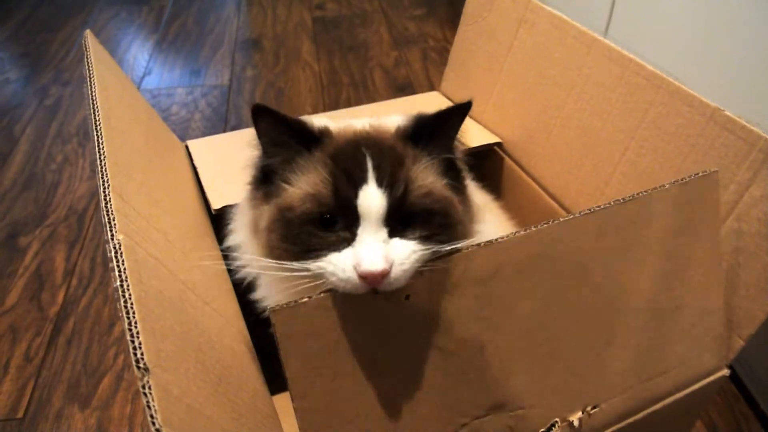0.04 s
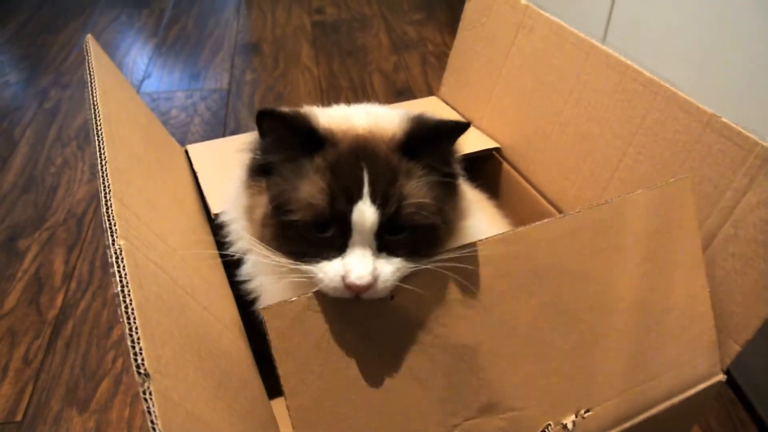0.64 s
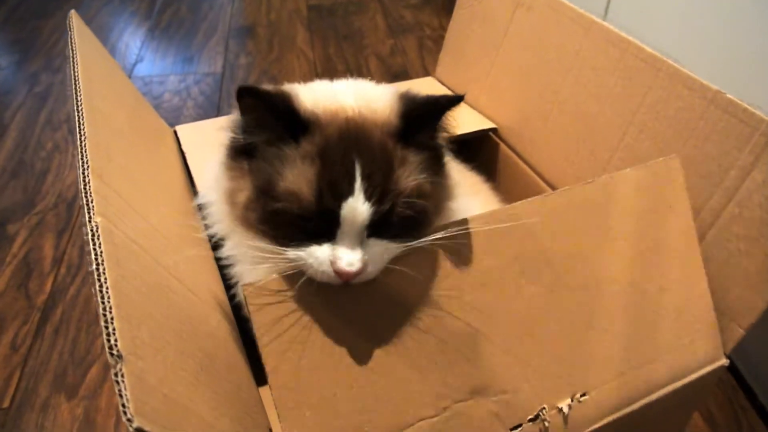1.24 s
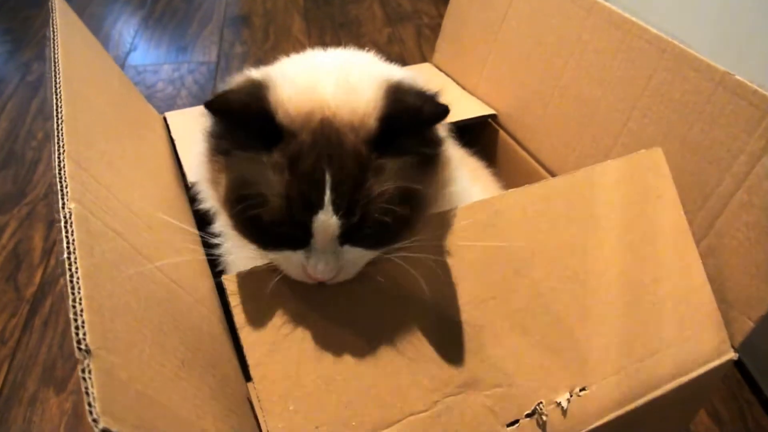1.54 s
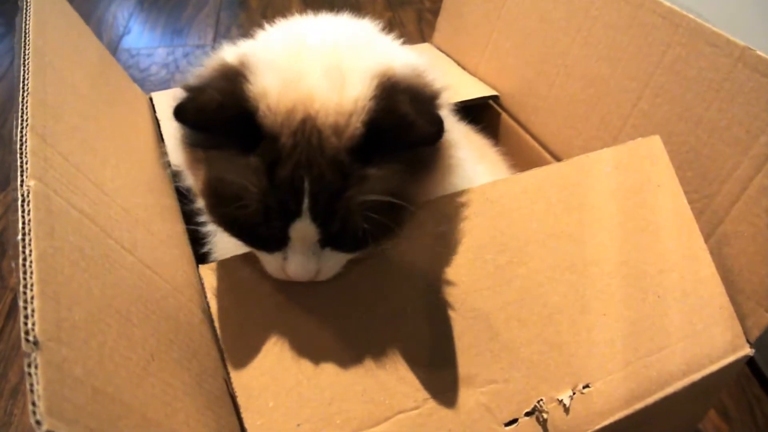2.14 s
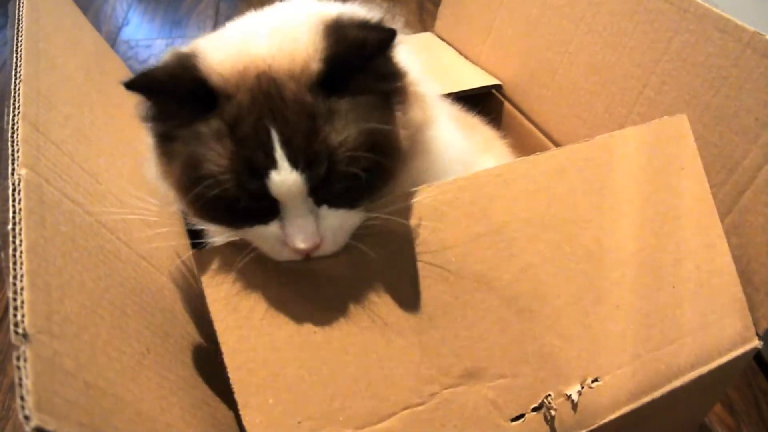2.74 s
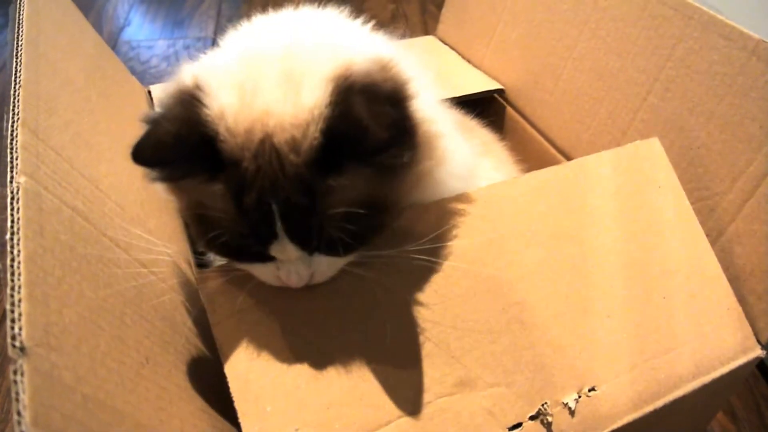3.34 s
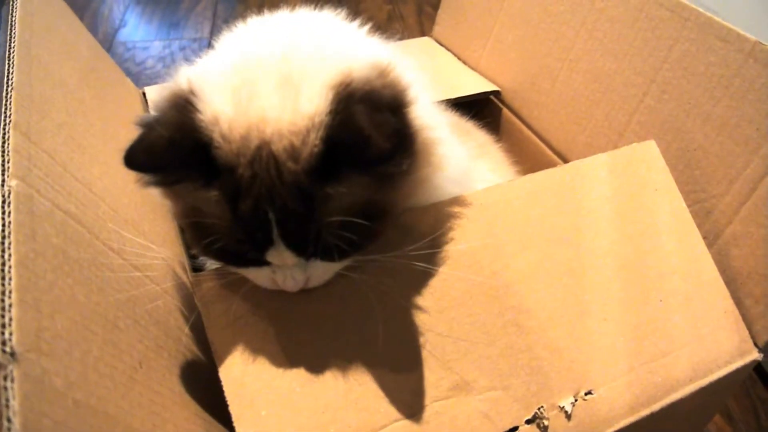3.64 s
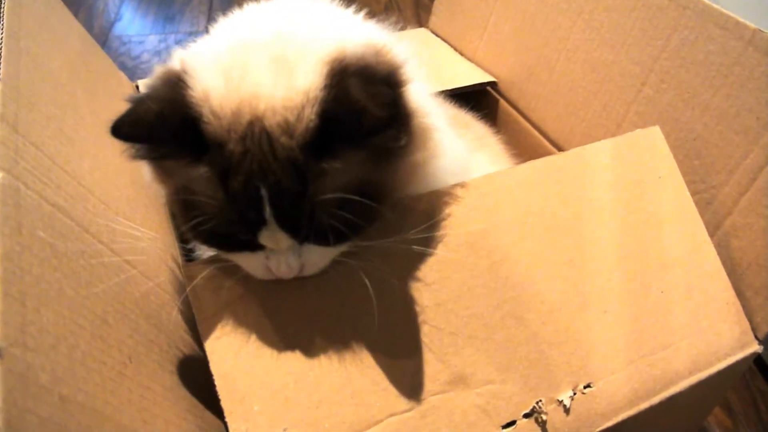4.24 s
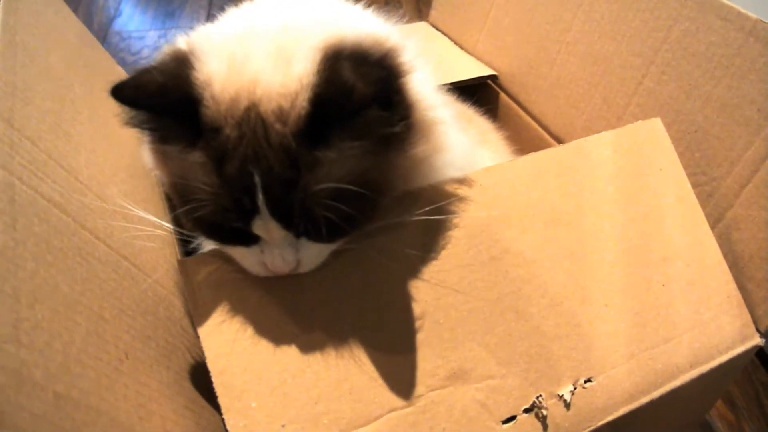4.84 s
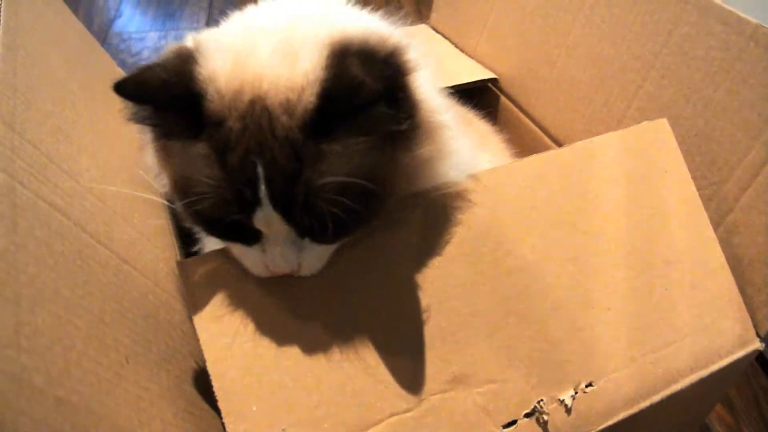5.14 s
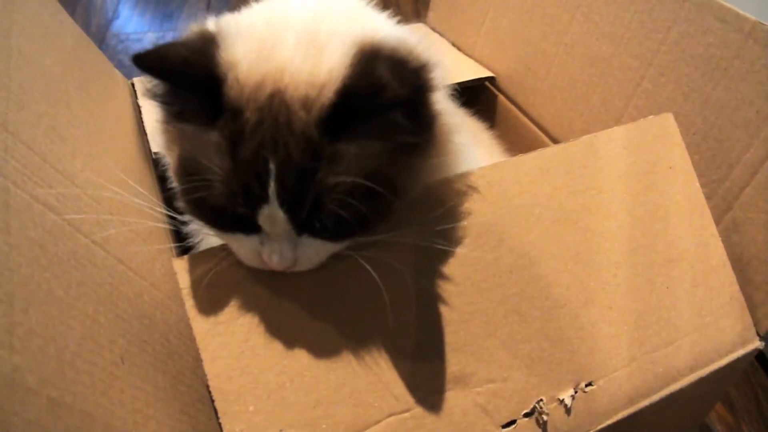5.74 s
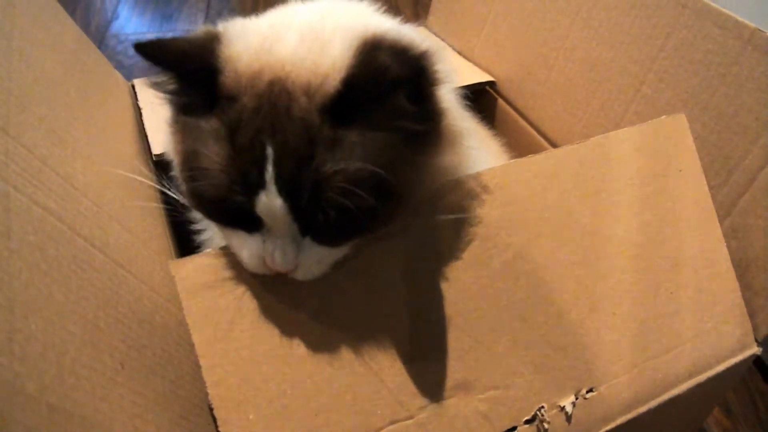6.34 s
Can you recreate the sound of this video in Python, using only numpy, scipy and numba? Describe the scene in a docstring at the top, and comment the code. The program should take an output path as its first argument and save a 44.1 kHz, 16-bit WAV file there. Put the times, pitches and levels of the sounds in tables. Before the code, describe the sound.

A cat moves inside a cardboard box, close to the microphone, in a quiet, hard-floored room with a steady hiss. The first second holds only faint fur rubbing and a soft hollow bump. At about 1.3 seconds a short rip and a knock start a bout of dry, crackly scratching with small snaps. At 2.1 seconds a claw lets go with the loudest snap, briefly overloading and ringing in the room. Light knocks follow, with another snap at 2.9 seconds. From 3 to 4.4 seconds the cat claws more steadily, with tiny tears, dull paw bumps and a sharp snap near 4.3. After a short pause, a crisp rip and soft knocks come just past 5 seconds. From 5.4 seconds the scratching builds into a dense flurry of tearing and snapping, peaking around 6.2 seconds and ending with a low bump and a last scrape.

```python
"""A quiet, hard-floored room: close to the microphone, a cat shifts about and claws its cardboard box.
Fibres snap and rip over a fine crackle, paws knock the hollow box into ringing, fur brushes the walls.
The room answers each snap over a steady hiss; the loudest snaps overload the recorder."""
import sys
import numpy as np
from scipy import signal
from scipy.fft import rfft, irfft, next_fast_len
from scipy.io import wavfile
from scipy.ndimage import uniform_filter1d, map_coordinates
from numba import njit

SR = 44100
rng = np.random.default_rng(int(sys.argv[2]) if len(sys.argv) > 2 else 0)


def wav_out(sig):
    """Save sig, one row per channel (or a flat mono array), as 16-bit PCM at SR to the path in sys.argv[1]."""
    wavfile.write(sys.argv[1], SR, np.round(np.clip(np.atleast_2d(sig).T, -1, 1) * 32767).astype(np.int16))


N = 286650

# air and panel modes of the box: f/Hz, level/dB, t60/s
BOX_MODES = [(99.4, -8, 0.066), (125, -9.5, 0.22), (153.6, -6, 0.24), (217.3, 2, 0.12), (293, 0, 0.14),
             (387.5, -7, 0.18), (481.4, -1.5, 0.049), (528, -5.5, 0.22), (634, 5, 0.052), (761, 3, 0.094),
             (1088, 15.5, 0.031), (1230, -30, 0.023), (1407, 5.5, 0.095), (2150, 11, 0.089)]
# left-right coherence of the direct sound: f/Hz, coherence/0-1
NEAR_COHERENCE = [(100, 0.95), (500, 0.63), (2000, 0.57), (8000, 0.22), (15000, 0.073)]
PANEL_FALL = 0.77  # brighter catches flex the panel less: dB per dB of brightness


def snaps(clawing, crack_t60_s=0.015, flex_t60_s=0.018, tip_t60_s=0.00068, gain_db=3, tip_db=3):
    """A claw lets go: sharp tip, very short crack, slightly longer flex of the panel."""
    # strong single catches in the paper liner: t/s, level/dB, brightness/dB, left-right/dB
    catches = [(1.4397, -30, 0, 1), (1.4617, -30, 6, -2), (1.5575, -24.5, 3, 3), (1.742, -34, 2, -1),
               (1.9977, -45, 9, 5), (2.0277, -35.5, 3, 0), (2.051, -39, -3, 0), (2.1017, -28.5, -2.5, 1),
               (2.1401, -5.5, -4.5, -1.5), (2.685, -41, -14, 0), (2.9001, -19.5, -3.5, 2),
               (3.042, -34, -3, 0), (3.366, -32.5, -5, 2), (3.408, -32, 1.5, -1), (3.7842, -33, -3, -10),
               (3.813, -35, 6, 1), (3.8633, -31, 0, 0), (3.9038, -33.5, 9, -3), (4.1314, -43, 12.5, 4),
               (4.2626, -17.5, -5.5, 2), (4.3668, -34.5, 4.5, 3), (4.411, -42, 6, 8),
               (4.461, -46.5, 9.5, 4), (5.4223, -37, -19.5, 2), (5.646, -37.5, 9, -2),
               (5.687, -25.5, -1, 1), (5.7348, -38.5, 15.5, 2), (5.949, -26.5, 6, 4),
               (6.1703, -26, -1.5, 4.8), (6.2115, -18, -1, 3)]
    force, t = np.zeros((3, 2, N)), np.arange(SR // 20) / SR
    t60_s = np.array([flex_t60_s, crack_t60_s, crack_t60_s])[:, None, None]
    decay = amp(-60 * t / t60_s) + amp(tip_db - 60 * t / tip_t60_s)
    for s, db, bright_db, pan_db in catches + small_catches(clawing):
        panel_db = -15.5 - PANEL_FALL * bright_db
        add(force, s, amp(db + gain_db) * shares(panel_db, bright_db, pan_db) * decay)
    return force


def small_catches(clawing, median_rate_hz=18):
    """Faint chance snaps that follow the effort: t/s, level/dB, brightness/dB, left-right/dB."""
    draws = rng.standard_normal((300, 4))
    times = np.cumsum(np.exp(.5 * draws[:, 0])) / median_rate_hz
    return [(s, 20 * np.log10(clawing[int(s * SR)] + 1e-9) - 1 + 2.5 * size,
             6.5 + 3 * bright, 8 + 4.5 * pan)
            for s, (_, size, bright, pan) in zip(times, np.clip(draws, -2, 2)) if s < N / SR]


def rips(edge_s=0.0011, release_t60_s=0.011, gain_db=-2.5, lead_s=0.014, lead_db=-14, usual_db=-39):
    """Fibres creak as the pull builds, then break in a dense run until the tension is gone."""
    # tearing pulls: t/s, length/s, level/dB, brightness/dB, left-right/dB
    pulls = [(1.309, 0.0073, -19.5, -3, -1.5), (3.248, .013, -20.5, 4.5, 1), (3.562, 0.0095, -31, 0, -1),
             (3.738, 0.0067, -42, 1, .5), (3.628, 0.01, -30.5, 1, -1), (3.893, 0.024, -39.5, 4, 1.3),
             (3.927, 0.0284, -36.5, 3, 3), (4.055, 0.013, -36, 5.5, 2.5), (4.1996, .009, -27, 3, 2),
             (5.144, 0.012, -18.5, 1, 3), (5.485, 0.011, -37, 4.5, 2), (5.809, 0.011, -24, -4, 3.5),
             (5.875, 0.015, -33, 0, 1.3), (5.903, 0.011, -28.5, 5, -1), (5.924, 0.017, -28, -0.5, 1.5),
             (5.987, 0.0022, -22.5, -1, -1), (6.019, 0.03, -28.5, 1, 1), (6.08, 0.0064, -30.5, 8.5, 4),
             (6.107, 0.026, -26.5, 0.5, 1.5)]
    force, t = np.zeros((3, 2, N)), np.arange(SR // 10) / SR - lead_s
    for s, length_s, db, bright_db, pan_db in pulls:
        creak = amp(lead_db) * np.minimum(1 + t / lead_s, 1)
        tear = 1 - np.exp(-np.maximum(t, 0) / edge_s)
        pull = (creak + tear) * amp(db + gain_db - 60 * np.maximum(t - length_s, 0) / release_t60_s)
        # the harder the rip, the less the panel follows
        panel_db = -5.5 - PANEL_FALL * bright_db - 0.38 * (db - usual_db)
        add(force, s - lead_s, shares(panel_db, bright_db, pan_db) * pull)
    return force * fibre_breaks(rate_hz=2000, spread_db=3.5, life_s=.00025, friction=.3)


def scratching(clawing, gain_db=-2):
    """Claws crackle lightly over the liner in uneven rasps."""
    slide = amp(gain_db) * clawing * unit(amp(2.7 * wobble(70)))
    breaks = fibre_breaks(rate_hz=450, spread_db=6, life_s=.0005, friction=.35)
    return shares(panel_db=-10, fine_db=0, pan_db=0) * slide * breaks


def fibre_breaks(rate_hz, spread_db, life_s, friction):
    """Spiky envelope, rms 1: fibres of random strength break at random over steady friction."""
    breaks = rng.random(N) < rate_hz / SR
    strength = amp(spread_db * np.clip(rng.standard_normal(N), -2, 2))
    power = signal.lfilter([1], [1, -np.exp(-2 / (life_s * SR))], breaks * strength ** 2)
    return np.sqrt(power / power.mean() + friction) / np.sqrt(1 + friction)


def shares(panel_db, fine_db, pan_db, fine_left_db=1):
    """Stereo gains of panel, liner and fine fibres; the finest sound beams to the left."""
    return np.array([amp(panel_db) * placed(pan_db / 2), placed(pan_db),
                     amp(fine_db) * placed(pan_db + fine_left_db)])


def cardboard(force):
    """Force bursts sound in the stiff panel, the liner and its finest fibres; the flaps reflect them."""
    # spectra of the three parts: f/Hz, level/dB
    panel = [(120, -32.5), (280, 0), (520, -1), (660, -5.5), (800, 1.5), (950, -3.5), (1150, 2), (1450, -1),
             (1750, -7), (2180, 1), (2700, -5.5), (5000, -29.5), (14000, -32)]
    liner = [(200, -53), (1500, -13), (2700, -11), (3300, -5), (3900, -5.5), (4500, -4), (5100, -3.5),
             (5700, -0.5), (6200, -3), (6900, 2.5), (7900, -0.5), (8800, -6), (11000, 2), (15500, -33)]
    fine_fibres = [(200, -69), (5000, -53), (8000, 2), (10200, 1), (12300, 0.5), (14000, -4.5), (15500, -9)]
    # near reflections: delay/s, level/dB
    flaps = [(.0013, -6), (.0072, -18), (0.0105, -20), (0.024, -20.5)]
    out = np.zeros((2, N))
    for drive, spectrum in zip(force, (panel, liner, fine_fibres)):
        power = drive ** 2
        for delay_s, db in flaps:
            add(power, delay_s, (amp(db) * drive) ** 2)
        out += colour(np.sqrt(power) * corrugations(noise(NEAR_COHERENCE)), spectrum)
    return out


def corrugations(x, depth_db=2.5):
    """The contact point wanders over the corrugations, shifting the fine spectral peaks."""
    z = signal.stft(x, SR, nperseg=512)[2]
    ripple = uniform_filter1d(rng.standard_normal(z.shape[1:]), size=4, axis=0)
    ripple = uniform_filter1d(ripple, size=9, axis=1)
    return signal.istft(z * unit(amp(depth_db * unit(ripple))), SR, nperseg=512)[1][:, :N]


def knocks(push_t60_s=0.0074, push_db=2, scatter_db=1.5, width_oct=0.77, attack_s=0.0018):
    """Each blow rings the modes near its own pitch; the cat's weight damps them more or less."""
    # blows and tugs on the walls: t/s, level/dB, most excited f/Hz, t60 factor
    blows = [(.85, -33, 257, .7), (1.0, -47, 278, .8), (1.311, -28.5, 360, 0.6), (1.313, -33, 1050, 1.0),
             (1.743, -44.5, 396, 1.2), (2.14, -27, 440, 1.2), (2.509, -40.5, 112, 1.0),
             (2.684, -38.5, 230, 0.57), (2.901, -32, 390, 0.85), (3.256, -32.5, 242, 0.87),
             (3.272, -37.5, 228, 0.59), (3.369, -44, 258, 1.5), (3.91, -47.5, 337, 4.8),
             (4.206, -40, 372, 1.4), (4.262, -37, 292, .89), (5.156, -38.5, 302, 0.7),
             (5.299, -35, 236, 0.84), (5.814, -38, 302, 0.89), (6.371, -34, 184, 0.63)]
    out, t = np.zeros(N), np.arange(SR // 2) / SR
    hz, mode_db, t60_s = np.transpose(BOX_MODES)[:, :, None]
    for s, db, pitch_hz, t60_factor in blows:
        size, phase = rng.standard_normal((2, len(BOX_MODES), 1))
        decay = amp(mode_db + scatter_db * size - 60 * t / (t60_s * t60_factor))
        modes = decay * np.sin(2 * np.pi * hz * t + np.pi * phase)
        ring = (modes / (1 + (np.log2(hz / pitch_hz) / width_oct) ** 2)).sum(0)
        band = signal.butter(2, [pitch_hz * .45, pitch_hz * 1.6], "bandpass", fs=SR)
        push = unit(signal.lfilter(*band, rng.standard_normal(len(t))))
        blow = ring / np.std(ring[:SR // 32]) + push * amp(push_db - 60 * t / push_t60_s)
        add(out, s, amp(db) * blow * (1 - np.exp(-t / attack_s)))
    return np.array([out, out])


def fur(rubbing, rub_db=-3, ring_db=-4, soft_hz=350):
    """Fur and paws rub the walls and keep the low box modes ringing."""
    # friction spectrum: f/Hz, level/dB
    rub_spectrum = [(40, -9), (100, -17), (160, -1.5), (220, -2.5), (260, 3), (295, 15.5), (350, -23.5),
                    (500, 8), (800, -5), (1300, -5.5), (2500, -9), (6000, -13.5)]
    slide = rubbing * unit(amp(3.35 * wobble(35)))
    t = np.arange(SR // 3) / SR
    hz, mode_db, t60_s = np.transpose(BOX_MODES)[:, :, None]
    modes = amp(mode_db - 60 * t / t60_s) * np.cos(2 * np.pi * hz * t) / (1 + (hz / soft_hz) ** 2)
    modes[::2] *= -1  # neighbouring modes swing against each other
    response = modes.sum(0)
    ring = signal.fftconvolve(slide * rng.standard_normal(N), response / np.linalg.norm(response))[:N]
    return amp(rub_db) * colour(slide * noise(NEAR_COHERENCE), rub_spectrum) + amp(ring_db) * ring


def effort(attack_s=0.0094, release_t60_s=0.34):
    """Clawing and rubbing envelopes: each bout sets in, swells or fades evenly, and dies away."""
    # bouts of movement: start/s, end/s, start level/dB, end level/dB, rubbing re clawing/dB
    bouts = [(-.05, 0.047, -51, -60, 12.5), (.28, 0.348, -53, -53.5, -2.5), (0.73, 0.877, -63, -45, 1),
             (0.973, 1.04, -55.5, -55.5, 7.5), (1.143, 1.557, -49.5, -42, -2),
             (1.702, 2.02, -42, -50.5, -11), (2.095, 2.276, -48, -54, 5), (3.013, 3.218, -44, -44.5, -15.5),
             (3.327, 3.426, -53, -44.5, -4), (3.5, 4.31, -38, -45.5, -10.5),
             (5.043, 5.124, -49, -46.5, -4.5), (5.41, 5.57, -48, -45.5, -7),
             (5.619, 6.24, -43.5, -35.5, -8), (6.351, 6.482, -36.5, -58, -3)]
    clawing, rubbing, t = np.zeros(N), np.zeros(N), np.arange(N) / SR
    for start, end, first_db, last_db, rub_db in bouts:
        db = np.interp(t, [start, end], [first_db, last_db])
        release_db = -60 * np.maximum(t - end, 0) / release_t60_s
        bout = np.clip((t - start) / attack_s, 0, 1) * amp(db + release_db)
        clawing = np.maximum(clawing, bout)
        rubbing = np.maximum(rubbing, amp(rub_db) * bout)
    return clawing, rubbing


def room(x, wet_db=-12.5, build_s=0.0009, blur_oct=0.093):
    """Diffuse tail: each band's energy builds up between the walls and dies at its own rate."""
    # reverberation time: f/Hz, t60/s
    decay_times = [(150, 0.69), (500, 1), (2000, 0.88), (6000, 0.93), (10000, 0.73), (15000, 0.48)]
    # tail spectrum: f/Hz, level/dB
    tail_spectrum = [(40, -29), (90, -10), (150, -2), (280, 0), (600, -3.5), (2000, 2), (5000, -1),
                     (8000, -4.5), (11000, -4), (15500, -7)]
    # tail, left to right: f/Hz, coherence/0-1
    tail_coherence = [(100, 0.52), (400, 0.92), (1200, 0.58), (4000, 0.06)]
    hz, t, z = signal.stft(x.mean(0), SR, nperseg=256)
    # sound sent in all directions lacks the fine peaks of the direct path
    octave = np.log2(hz + 1)
    blur = np.exp(-((octave[:, None] - octave) / blur_oct) ** 2)
    sent = blur / blur.sum(1, keepdims=True) @ abs(z) ** 2
    linger = (amp(-60 * t / along(decay_times, hz)[:, None]) * (1 - np.exp(-t / build_s))) ** 2
    energy = signal.fftconvolve(sent, linger / linger.sum(1).mean(), axes=1)[:, :len(t)]
    field = signal.stft(noise(tail_coherence), SR, nperseg=256)[2]
    tail = signal.istft(field / np.std(field) * np.sqrt(abs(energy)), SR, nperseg=256)[1][:, :N]
    return amp(wet_db) * colour(tail, tail_spectrum)


def hiss(level_db=-47.5):
    """Steady, wide background noise."""
    # background spectrum: f/Hz, level/dB
    air_spectrum = [(12, -57), (20, -11), (65, -6.5), (98, -6.5), (285, -3.5), (446, -5.5), (527, -4.5),
                    (590, -3.5), (642, -4.5), (802, -5), (1190, -8), (3070, -10), (3530, -10), (10200, -13),
                    (16000, -15.5)]
    # background, left to right: f/Hz, coherence/0-1
    air_coherence = [(60, 0.1), (150, 0), (380, 0.06), (950, 0.1), (2380, 0), (5980, 0.01), (15000, 0.1)]
    return amp(level_db) * colour(noise(air_coherence), air_spectrum)


def amp(db):
    """Decibels to gain."""
    return 10 ** (np.asarray(db) / 20)


def unit(x):
    """Scale to rms 1."""
    return x / np.sqrt(np.mean(x ** 2) + 1e-20)


def placed(pan_db):
    """Left and right gains."""
    return amp([[pan_db / 2], [-pan_db / 2]])


def along(points, hz):
    """Interpolate (f/Hz, value) points on a log axis."""
    f, v = np.transpose(points)
    return np.interp(np.log(hz + 1), np.log(f + 1), v)


def add(track, s, sound):
    """Mix a sound into a track at time s."""
    i = max(0, round(s * SR))
    part = track[..., i:i + sound.shape[-1]]
    part += sound[..., :part.shape[-1]]


def wobble(rate_hz):
    """Smooth curve through random knots."""
    knots = rng.standard_normal(int(N * rate_hz / SR) + 4)
    return map_coordinates(knots, [np.arange(N) * rate_hz / SR])


def colour(x, spectrum):
    """Minimum-phase filter; white noise keeps its power."""
    m = 2 * next_fast_len(N)
    gain = unit(amp(along(spectrum, np.fft.rfftfreq(m, 1 / SR))))
    cepstrum = irfft(np.log(gain))
    cepstrum[1:m // 2] *= 2
    cepstrum[m // 2 + 1:] = 0
    return irfft(rfft(x, m) * np.exp(rfft(cepstrum)), m)[..., :N]


def noise(coherence):
    """White stereo noise of given left-right coherence."""
    turn = np.arccos(np.clip(along(coherence, np.fft.rfftfreq(N, 1 / SR)), 0, 1)) / 2
    mid, side = irfft(rfft(rng.standard_normal((2, N))) * [np.cos(turn), np.sin(turn)], N)
    return np.array([mid + side, mid - side])


@njit
def follower(level, attack, release):
    """Track a level with separate rise and fall coefficients."""
    out, now = np.empty_like(level), 0.0
    for i in range(len(level)):
        now += (level[i] - now) * (attack if level[i] > now else release)
        out[i] = now
    return out


def scene():
    """Cat in its box, room tail and hiss."""
    clawing, rubbing = effort()
    force = np.sqrt(snaps(clawing) ** 2 + rips() ** 2 + scratching(clawing) ** 2)
    claws = cardboard(force)
    box = knocks() + fur(rubbing)
    return claws + box + room(claws + amp(0.5) * box) + hiss()


def record(dry, limit_db=-9, attack_s=0.0016, release_s=0.013, top_hz=16000):
    """The recorder ducks after loud snaps, clips at full scale and cuts all above its band limit."""
    level = follower(abs(dry).max(0), 1 / (attack_s * SR), 1 / (release_s * SR))
    ducked = dry / np.maximum(level / amp(limit_db), 1)
    clipped = np.clip(ducked, -1, 1)
    return irfft(rfft(clipped) * (np.fft.rfftfreq(N, 1 / SR) < top_hz), N)


dry = scene()
out = record(dry)
wav_out(out)
```